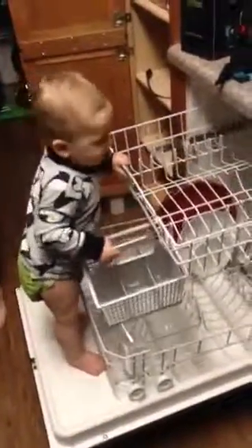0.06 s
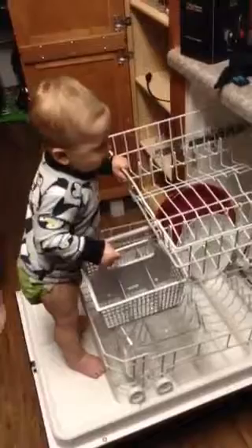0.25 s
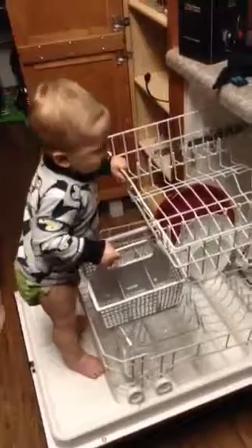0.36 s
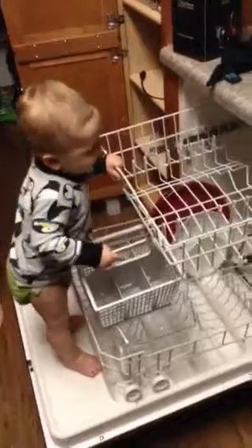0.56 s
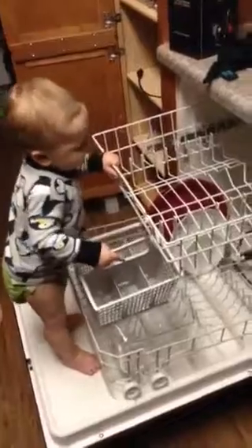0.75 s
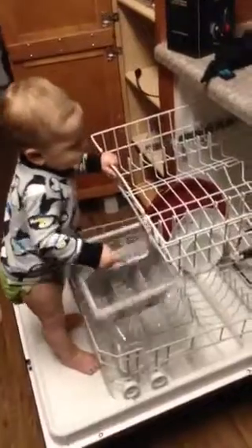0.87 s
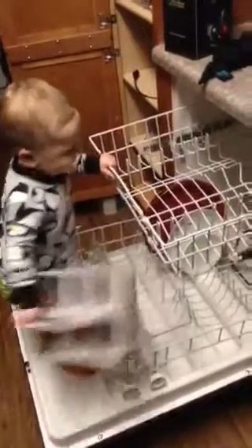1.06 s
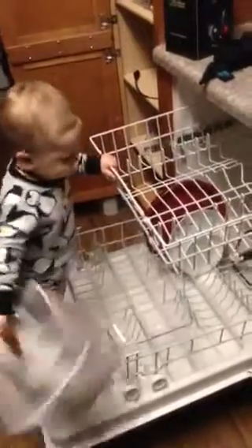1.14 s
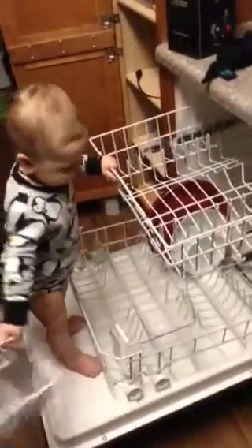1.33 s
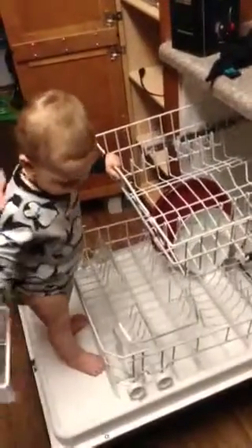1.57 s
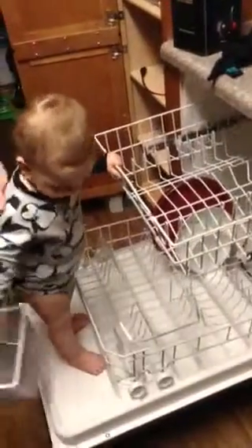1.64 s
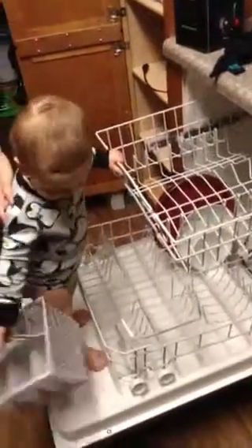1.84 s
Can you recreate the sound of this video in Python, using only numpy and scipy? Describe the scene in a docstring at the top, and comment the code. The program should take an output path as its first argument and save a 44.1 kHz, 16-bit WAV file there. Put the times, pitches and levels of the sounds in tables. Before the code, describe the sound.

A plastic cutlery basket bangs once, loudly, against a ringing wire dishwasher rack. It scuffs and knocks more weakly as it is lifted out, with soft thumps from the open door, heard nearby in a quiet kitchen.

```python
"""A plastic cutlery basket bangs into the wire rack of an open dishwasher in a quiet kitchen.
It scuffs over the wires and knocks a few more times as it is lifted out. Each contact is a click
that stirs a dense, short body resonance and the room; rack, tines and basket ring as dying sines.
The plastic ticks and the open door thumps softly over a low room hum."""
import sys
import numpy as np
from scipy import signal
from scipy.fft import rfft, irfft
from scipy.io import wavfile
from scipy.ndimage import uniform_filter1d, minimum_filter1d

SR = 44100
rng = np.random.default_rng(int(sys.argv[2]) if len(sys.argv) > 2 else 0)


def wrap_up_sound(samples):
    """Save the sound to the file named by the first command line argument, as 16-bit audio."""
    columns = np.atleast_2d(samples).T
    # keep every value between -1 and 1, then stretch to whole-number steps
    tamed = np.clip(columns, -1, 1)
    steps = np.round(tamed * 32767).astype(np.int16)
    wavfile.write(sys.argv[1], SR, steps)


N = 83790
RING_SAMPLES = round(0.7 * SR)


def amp(db):
    return 10 ** (np.asarray(db) / 20)


def unit_rms(x):
    return x / np.sqrt(np.mean(x ** 2) + 1e-20)


def unit_energy(x):
    return x / np.linalg.norm(x)


def curve_at(points, hz):
    """A curve's value between its points, on a log frequency axis."""
    point_hz, value = np.transpose(points)
    return np.interp(np.log(hz + 1), np.log(point_hz + 1), value)


def add(mix, start_s, sound):
    part = mix[max(round(start_s * SR), 0):][:len(sound)]
    part += sound[:len(part)]


def click(colour, tilt_db, ripple_db=0, size=4096):
    """One contact: a minimum-phase pulse whose colour is tilted by tilt_db per octave."""
    hz = abs(np.fft.fftfreq(size, 1 / SR))
    octaves = np.log2(np.maximum(hz, 150) / 2000)
    log_gain = np.log(amp(curve_at(colour, hz) + tilt_db * octaves + ripple_db))
    spectrum = np.exp(np.conj(signal.hilbert(log_gain)))
    return unit_energy(np.fft.ifft(spectrum).real[:size // 2])


def dense_modes(t60_s):
    """Modes packed so closely that they sound as a dying burst of noise."""
    t = np.arange(RING_SAMPLES) / SR
    return unit_energy(rng.standard_normal(len(t)) * amp(-60 * t / t60_s))


def ring(modes, rise_s):
    """Struck modes (pitch_hz, level_db, t60_s): sines that build up briefly and die away."""
    t = np.arange(RING_SAMPLES) / SR
    sines = sum(amp(db - 60 * t / t60_s) * np.sin(2 * np.pi * (hz * t + rng.random()))
                for hz, db, t60_s in modes)
    return unit_energy(sines * (1 - np.exp(-t / rise_s)))


def rib_ripple(step_hz=170, depth_db=7, low_hz=3400, size=4096):
    """Uneven peaks and dips that the plastic ribs give to the treble, in dB per bin."""
    hz = abs(np.fft.fftfreq(size, 1 / SR))
    turns_hz = np.cumsum(rng.uniform(0.5, 2, size) * step_hz)
    heights = (-1) ** np.arange(size) * rng.uniform(0.72, 1, size)
    return depth_db * np.interp(hz, turns_hz, heights) * (hz > low_hz)


def kitchen_tail(rise_s=0.005):
    """The room's answer: it builds up quickly and dies soonest in the treble."""
    # reverb time of the kitchen: frequency_hz, t60_s
    decay = [(150, 0.3), (500, 0.49), (1500, 0.38), (4000, 0.42), (8000, 0.27), (15000, 0.23)]
    t = np.arange(RING_SAMPLES) / SR
    hz, frame_s, bands = signal.stft(rng.standard_normal(len(t)), SR, nperseg=256)
    fade = amp(-60 * frame_s / curve_at(decay, hz)[:, None])
    tail = signal.istft(bands * fade, SR, nperseg=256)[1][:len(t)]
    return unit_energy(tail * (1 - np.exp(-t / rise_s)))


def blows(contacts, colour, body_t60_s, room_db, direct_db, sheen=np.zeros(1)):
    """Contacts on one object: each cracks, stirs the same body modes and fills the room."""
    out, body, ripple_db = np.zeros(N), dense_modes(body_t60_s), rib_ripple()
    add(body, 0, sheen)
    body[0] += amp(direct_db)
    for start_s, db, tilt_db, *_ in contacts:
        response = body + amp(room_db) * kitchen_tail()
        add(out, start_s, amp(db) * signal.fftconvolve(click(colour, tilt_db, ripple_db), response))
    return out


def room_tone(waver_hz=8, waver_depth=0.3):
    """Soft low rush of the kitchen with a wavering hum."""
    # spectrum of the rush: frequency_hz, level_db
    colour = [(18, -82.5), (30, -55), (90, -34), (140, -12), (187, -11.5), (219, 0), (263, -13), (299, -11),
              (443, -12), (479, -11.5), (897, -25), (970, -21), (1360, -25.5), (1590, -29.5), (15500, -38)]
    # tones of the hum: pitch_hz, level_db
    hum = [(220.7, -71), (296.1, -64)]
    hz, t = np.fft.rfftfreq(N, 1 / SR), np.arange(N) / SR
    rush = irfft(rfft(rng.standard_normal(N)) * amp(curve_at(colour, hz)), N)
    out = amp(-55.5) * unit_rms(rush)
    for pitch_hz, db in hum:
        waver = unit_rms(irfft(rfft(rng.standard_normal(N)) * np.exp(-(hz / waver_hz) ** 2), N))
        tone = np.sin(2 * np.pi * (pitch_hz * t + rng.random()))
        out += amp(db) * unit_rms((1 + waver_depth * waver) * tone)
    return out


def wire_knock():
    """A first light bump leaves the rack wires singing."""
    # spectrum of the bump: frequency_hz, level_db
    colour = [(100, -30.5), (700, -6.5), (1300, 0.5), (1900, -9.5), (2700, -8.5), (3300, -19),
              (15000, -35.5)]
    # ring of the wires: pitch_hz, level_db, t60_s
    wire_modes = [(1118, -7, 0.2), (1281, -6, 0.2), (1571, 0, 0.4), (2322, -2, 0.35), (2757, -4, 0.24),
                  (3586, -13, 0.22), (4843, -18, 0.27), (5391, -14, 0.26)]
    out = amp(-5) * blows([(0, 0, 0.00035)], colour, body_t60_s=0.15, room_db=-2.5, direct_db=-44)
    add(out, 0, amp(-2.5) * ring(wire_modes, rise_s=0.0027))
    return out


def plastic_ticks():
    """Light touches of plastic: a bright, dry snap and a brief ring."""
    # touches: start_s, level_db, tilt_db_per_octave, snap_db
    touches = [(0.031, -10, -8, -26), (0.4071, 3.5, -6, -2), (0.6411, -14.5, -9, -17), (.926, -6, -9, -14),
               (1.1397, -14.5, 0.5, -10), (1.228, -16.5, -5.5, -13), (1.237, -13, -3, -7.5),
               (1.3008, -20, 0, -9)]
    # spectrum of a tick: frequency_hz, level_db
    colour = [(40, -63.5), (300, -25.5), (1500, -14), (3100, -11.5), (3800, -1), (6000, -0.5), (9000, -2.5),
              (12500, -2.5), (15500, -3.5)]
    out = blows(touches, colour, body_t60_s=0.07, room_db=-2, direct_db=-12, sheen=amp(-5) * shimmer())
    for start_s, db, _, snap_db in touches:
        snap = signal.fftconvolve(click(colour, 0), dense_modes(t60_s=0.006))
        add(out, start_s, amp(db + snap_db) * snap)
    return amp(-10.5) * out


def shimmer(count=32, low_hz=7000, top_hz=15200, t60_s=0.16):
    """Many thin, high modes of the wires and ribs, scattered through the treble."""
    spread = (np.arange(count) + rng.random(count)) / count
    pitches_hz = low_hz + spread * (top_hz - low_hz)
    return ring([(hz, 0, t60_s) for hz in pitches_hz], rise_s=0.00084)


def basket_bang():
    """The basket lands on the rack in a quick run of contacts; the hardest sets the rack ringing."""
    # contacts of the landing: start_s, level_db, tilt_db_per_octave
    contacts = [(0.2342, -2.5, 1), (0.2387, 1.5, -0.5), (0.2479, -6.5, -2), (0.264, -6.5, 1.5),
                (.273, -10.5, -2.5), (0.292, -13.5, 0.5), (.313, -7, -2.5), (.332, -16.5, -2.5)]
    # spectrum of a contact: frequency_hz, level_db
    colour = [(40, -63), (100, -57.5), (240, -30), (450, -29.5), (720, -16.5), (900, -17.5), (1210, -4),
              (1700, -3.5), (1970, -13), (2300, -5), (3700, -13.5), (4050, -12), (5600, -13), (6300, -17),
              (9000, -21.5), (15000, -35)]
    # rack and basket ringing together: pitch_hz, level_db, t60_s
    rack_modes = [(569, -18, 0.22), (721, -7, 0.22), (1052, -5, 0.3), (1250, 0.5, 0.28), (1437, -7, 0.33),
                  (1641, -5, 0.33), (1686, 2, 0.3), (1799, -8, 0.33), (2221, -4, 0.33), (2760, -6, 0.28),
                  (2927, -5, 0.25), (3082, -5, 0.22), (3309, -2, 0.23), (3930, -7, 0.28), (4113, -2, 0.28),
                  (4753, -9, .22), (4867, -8, .22), (5062, -6, 0.21), (5380, -7, 0.26), (6578, -12, .2),
                  (6706, -9, 0.2), (7327, -14, .2), (8014, -9, 0.19), (8048, -9, 0.26), (9289, -13, 0.2),
                  (11180, -11, 0.17), (13036, -15, 0.17), (13507, -16, .15), (13927, -18, .15)]
    out = amp(15.5) * blows(contacts, colour, body_t60_s=0.23, room_db=-3, direct_db=-17.5,
                            sheen=amp(-5.5) * shimmer())
    hardest_s = contacts[1][0]
    add(out, hardest_s, amp(20) * ring(rack_modes, rise_s=0.0028))
    return out


def door_thumps():
    """Weight shifts on the open door; the first push makes its panel boom."""
    # pushes on the door: start_s, level_db, tilt_db_per_octave
    pushes = [(.41, -6.5, -5), (.428, 2.5, -0.5), (.52, -8, -5.5), (0.564, -5, -1.5), (0.945, -2.5, -1),
              (0.961, -1, -1.5), (1.03, -6.5, -3), (1.285, -12.5, 3)]
    # spectrum of a thump: frequency_hz, level_db
    colour = [(40, -49), (80, -28), (140, -10), (185, 1), (260, -12), (350, -6), (600, -6.5), (1200, -24),
              (4000, -48)]
    # boom of the panel: pitch_hz, level_db, t60_s
    panel_modes = [(189.5, -9, 0.23), (343, -7, 0.21), (637, -10.5, 0.15)]
    out = amp(-12.5) * blows(pushes, colour, body_t60_s=0.11, room_db=-2, direct_db=-14.5)
    add(out, pushes[0][0], amp(-6.5) * ring(panel_modes, rise_s=0.0091))
    return out


def basket_scuffs(slips_per_s=1500):
    """Tiny random slips swell and fade while the basket slides over the wires."""
    # slides: start_s, length_s, level_db, tilt_db_per_octave
    slides = [(0.564, 0.079, -37, -5), (0.913, 0.13, -36, 1)]
    # spectrum of a slip: frequency_hz, level_db
    colour = [(40, -70), (200, -23), (600, -2), (1500, 11), (4000, -4.5), (7000, -1.5), (12000, -5.5),
              (15500, -8)]
    out = np.zeros(N)
    for start_s, length_s, db, tilt_db in slides:
        slips = rng.standard_normal(N) * (rng.random(N) < slips_per_s / SR)
        swell = np.sqrt(np.hanning(round(length_s * SR)))
        response = dense_modes(t60_s=0.13) + amp(-2.5) * kitchen_tail()
        one_slip = signal.fftconvolve(click(colour, tilt_db), response)
        add(out, start_s, amp(db) * signal.fftconvolve(swell * slips[:len(swell)], one_slip))
    return out


def side_wall_knock(start_s=0.715, t60_s=0.14):
    """The basket's side wall bumps the rack once, with a hollower note."""
    # spectrum of the bump: frequency_hz, level_db
    colour = [(100, -47), (450, -15.5), (745, -5), (1000, -7), (1400, -1.5), (2700, -9.5), (3000, -14),
              (3400, -11.5), (4400, -16.5), (4800, -20), (7400, -28), (15000, -47)]
    # ring of the side wall: pitch_hz, level_db
    wall_modes = [(573, -12), (675, -9), (743, 0), (1323, 0), (1572, 0), (1642, -4), (2441, -6), (2669, -5),
                  (2755, -5), (3377, -10), (4071, -7), (4397, -9), (7250, -23)]
    out = amp(-6.5) * blows([(start_s, 0, 0)], colour, body_t60_s=t60_s, room_db=1, direct_db=-23,
                            sheen=amp(-8) * shimmer())
    add(out, start_s, amp(-2) * ring([(hz, db, t60_s) for hz, db in wall_modes], rise_s=0.0069))
    return out


def lift_knocks(tine_t60_s=0.12):
    """The basket catches on the tines as it is lifted; each knock rings both in its own proportion."""
    # knocks: start_s, level_db, tilt_db_per_octave, basket_db, tines_db
    knocks = [(0.7977, -3.5, 1.5, 5, -27), (.808, -6, 0, -10, -12), (.829, -13, -3, -18, -8),
              (0.882, -15.5, 0, -20, -11), (0.8891, -12, -1, -5.5, -3), (0.8949, -13.5, -1.5, -23, 6),
              (1.012, -16, -1, -2.5, -2), (1.021, -18.5, -5.5, -9.5, -2)]
    # spectrum of a knock: frequency_hz, level_db
    colour = [(59, -68), (100, -47), (162, -29), (497, -25), (742, -7.5), (977, -12), (1590, -4.5),
              (1880, 0), (2040, -17.5), (2220, -7), (2370, -8.5), (4460, -21), (5070, -21), (7410, -26),
              (15500, -45.5)]
    # ring of the basket struck on its base: pitch_hz, level_db, t60_s
    basket_modes = [(674, -17, 0.2), (722, -10, .14), (757, -7, 0.16), (807, -8, 0.14), (1328, -14, 0.17),
                    (1448, -11, .22), (1571, 2, 0.18), (1770, -5, 0.2), (1811, -5, 0.2), (2227, 0, 0.21),
                    (2677, -8, 0.15), (3101, -10, 0.14), (4083, -16, 0.18), (4395, -10, 0.14),
                    (7380, -15, 0.15)]
    # ring of the rack's tines: pitch_hz, level_db
    tine_modes = [(851, -12), (1077, -3), (1642, -6), (1846, -4), (1895, -2), (2275, -6), (2700, -7),
                  (3510, -9), (4011, -14)]
    out = amp(9) * blows(knocks, colour, body_t60_s=0.12, room_db=-5, direct_db=-18.5,
                         sheen=amp(-14) * shimmer())
    basket = ring(basket_modes, rise_s=0.00078)
    tines = ring([(hz, db, tine_t60_s) for hz, db in tine_modes], rise_s=0.00073)
    for start_s, db, _, basket_db, tines_db in knocks:
        add(out, start_s, amp(8.5 + db) * (amp(basket_db) * basket + amp(tines_db) * tines))
    return out


def scene():
    """Basket, rack and door over the room tone, in mono."""
    impacts = wire_knock() + basket_bang() + side_wall_knock() + lift_knocks()
    return (impacts + plastic_ticks() + basket_scuffs() + door_thumps() + room_tone())[None]


def record(dry, ceiling_db=-2.8, low_cut_hz=42, high_cut_hz=15300):
    """A quick limiter holds down the big bang; filters trim the deep bass and the very top."""
    gain = np.minimum(1, amp(ceiling_db) / (abs(dry) + 1e-9))
    smooth_gain = uniform_filter1d(minimum_filter1d(gain, size=121), size=121)
    low_cut = signal.butter(2, low_cut_hz, "high", fs=SR, output="sos")
    high_cut = signal.firwin(511, high_cut_hz, window=("kaiser", 9), fs=SR)
    held = signal.sosfilt(low_cut, dry * smooth_gain)
    return signal.oaconvolve(held, high_cut[None], "same")


dry = scene()
out = record(dry)
wrap_up_sound(out)
```